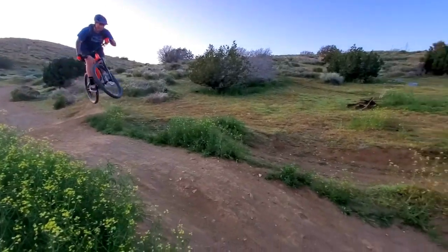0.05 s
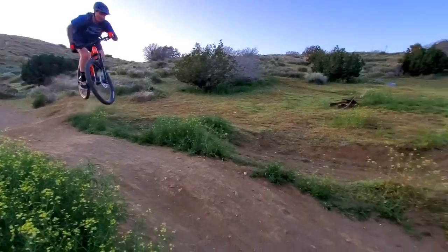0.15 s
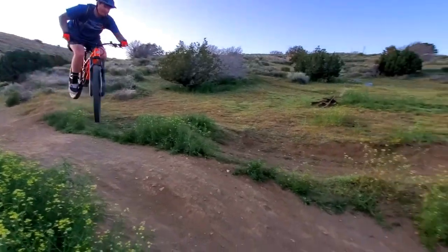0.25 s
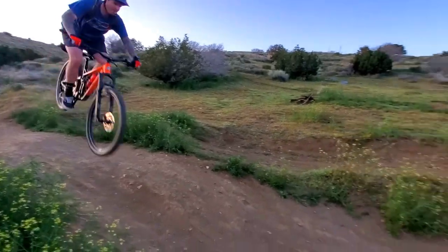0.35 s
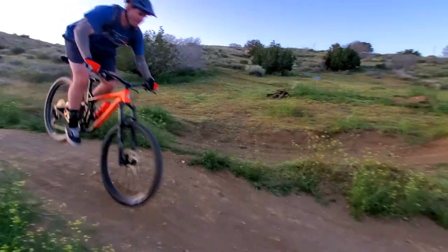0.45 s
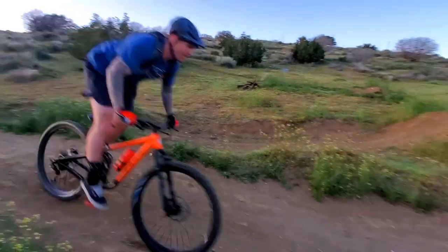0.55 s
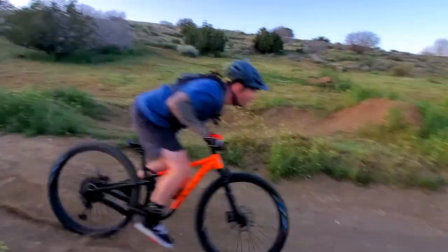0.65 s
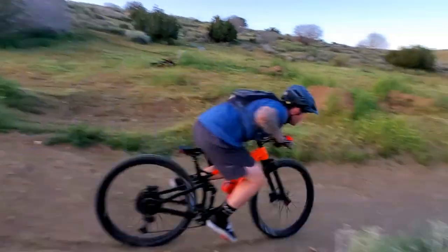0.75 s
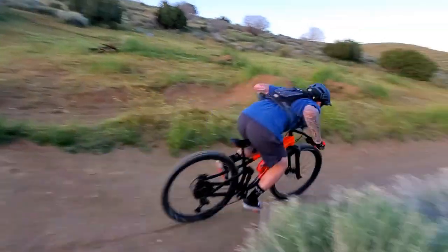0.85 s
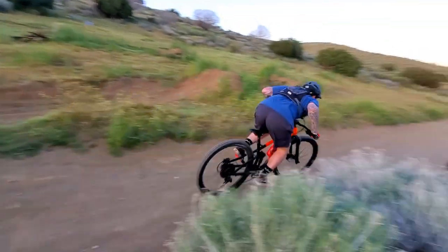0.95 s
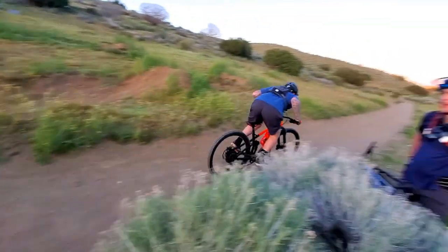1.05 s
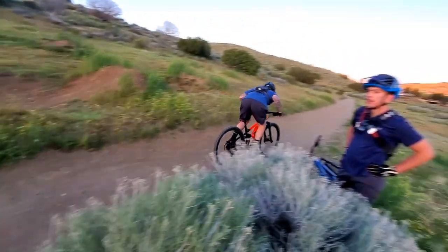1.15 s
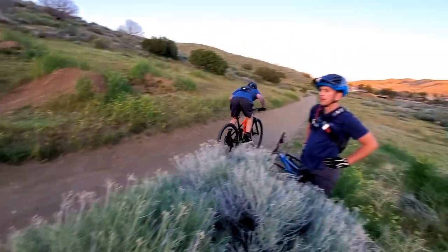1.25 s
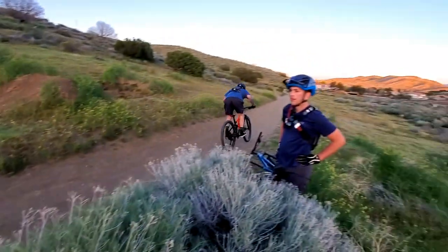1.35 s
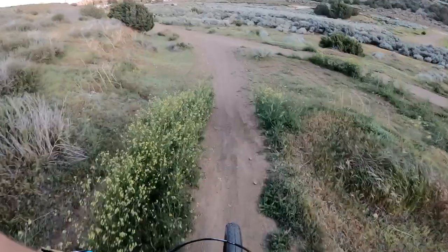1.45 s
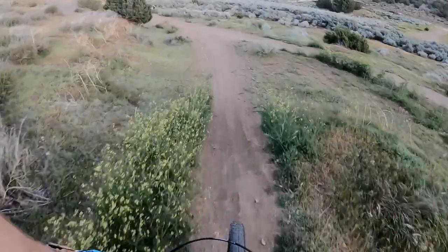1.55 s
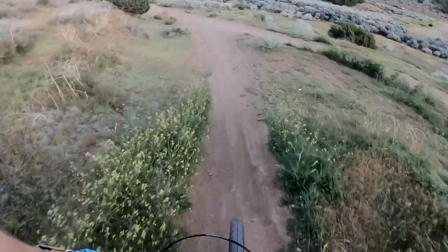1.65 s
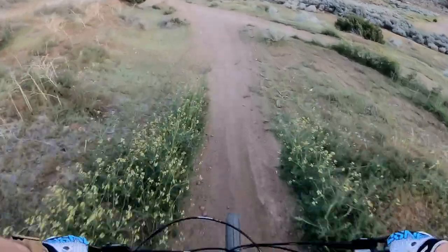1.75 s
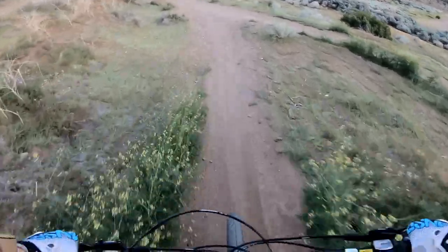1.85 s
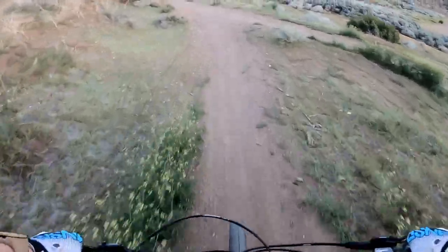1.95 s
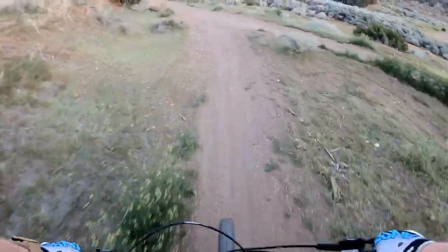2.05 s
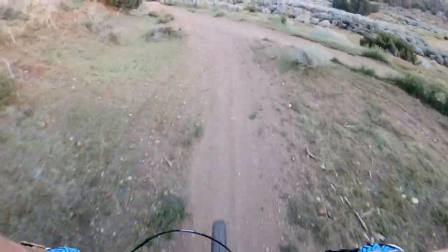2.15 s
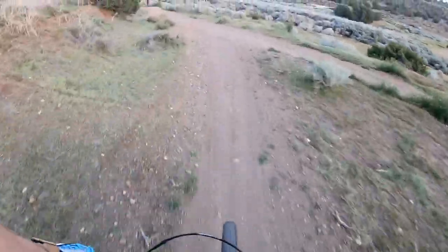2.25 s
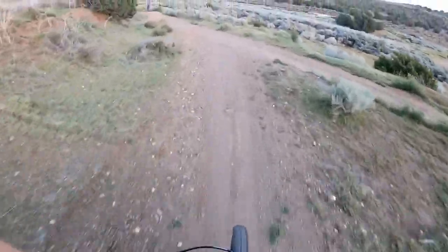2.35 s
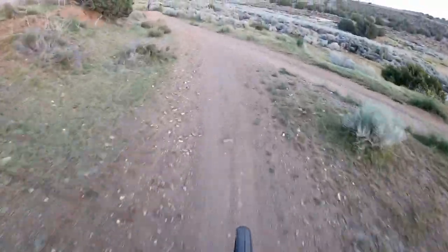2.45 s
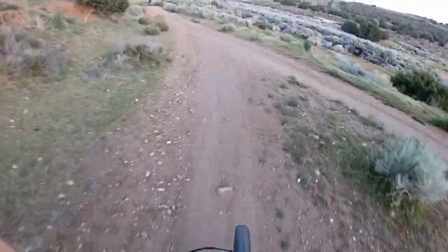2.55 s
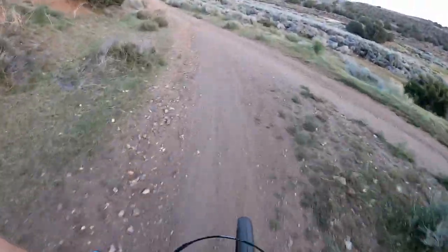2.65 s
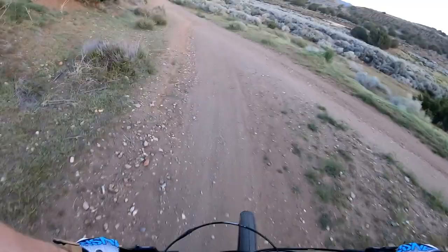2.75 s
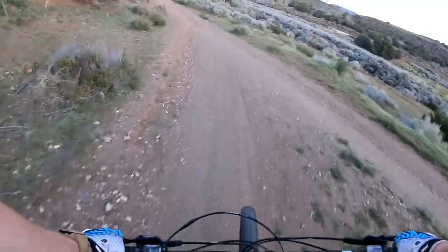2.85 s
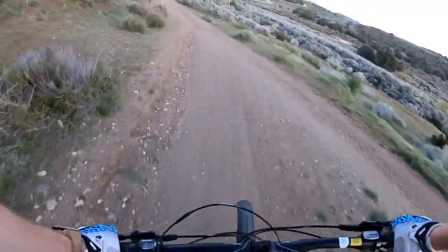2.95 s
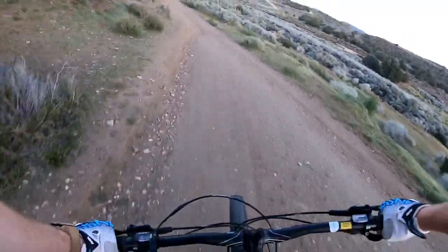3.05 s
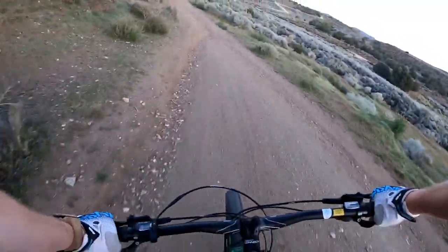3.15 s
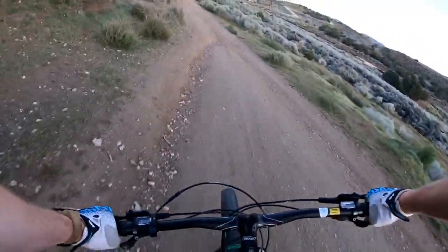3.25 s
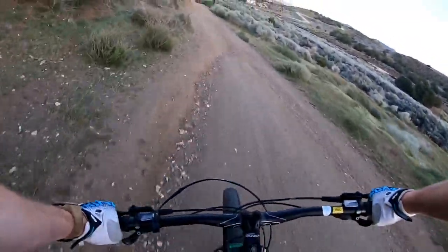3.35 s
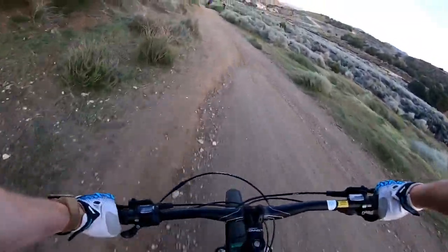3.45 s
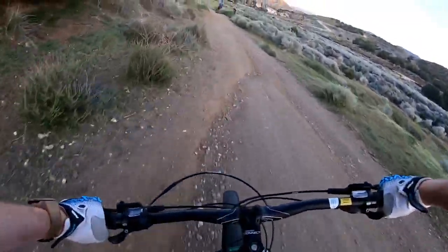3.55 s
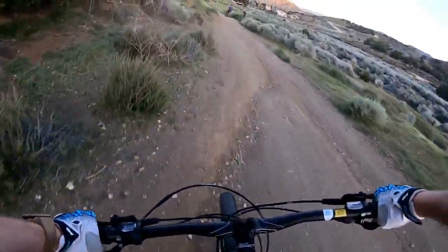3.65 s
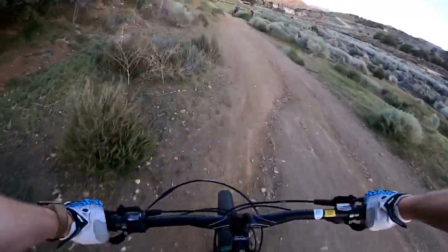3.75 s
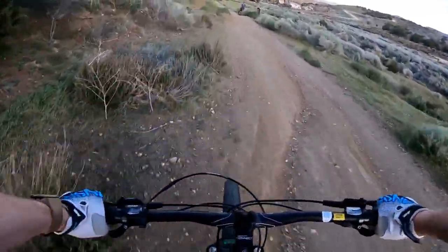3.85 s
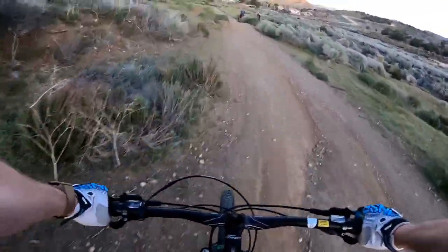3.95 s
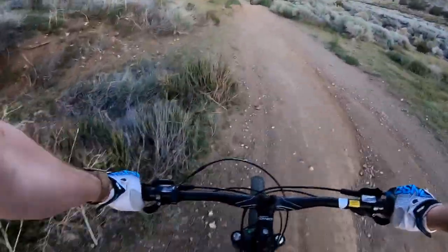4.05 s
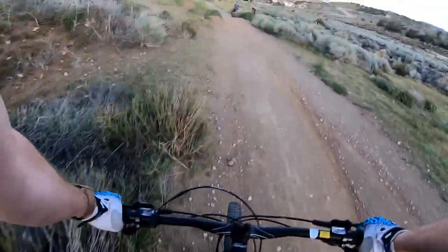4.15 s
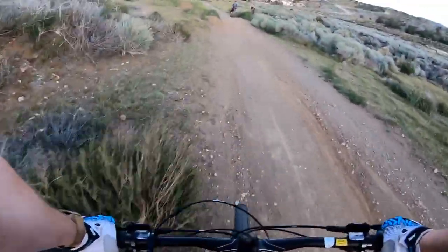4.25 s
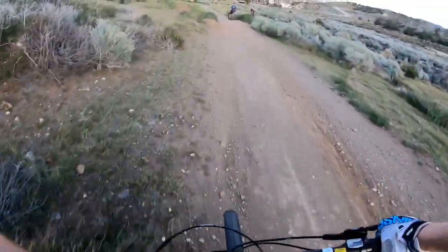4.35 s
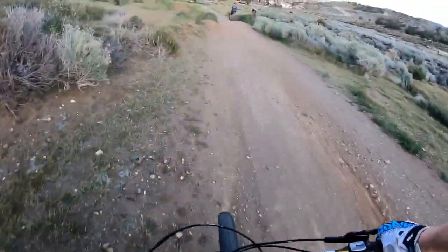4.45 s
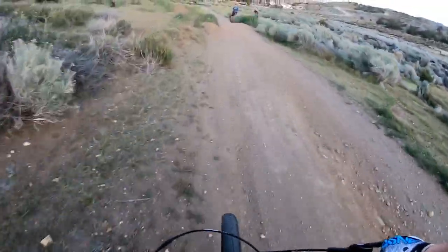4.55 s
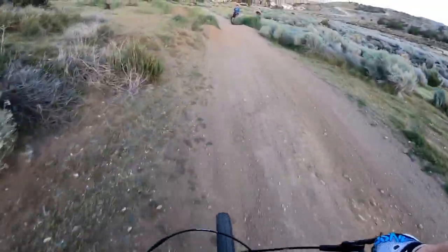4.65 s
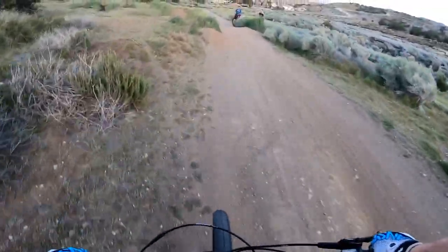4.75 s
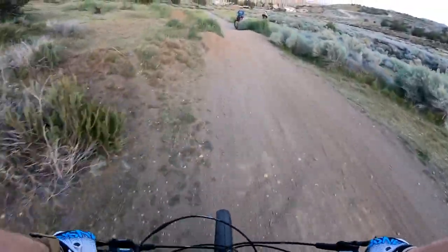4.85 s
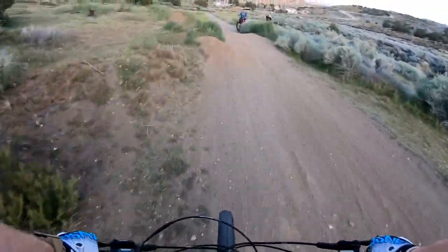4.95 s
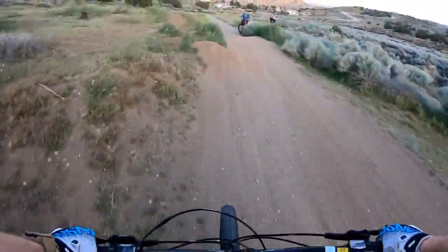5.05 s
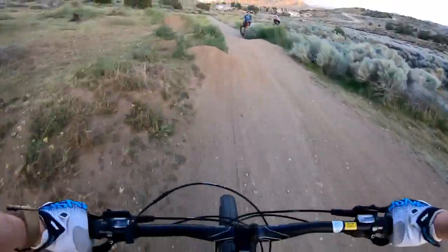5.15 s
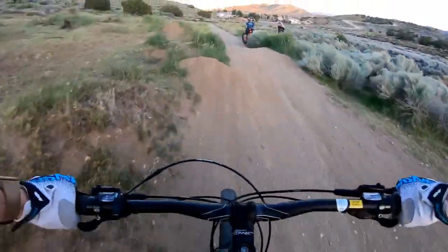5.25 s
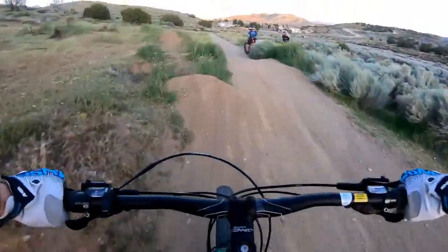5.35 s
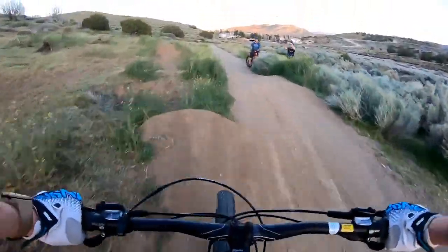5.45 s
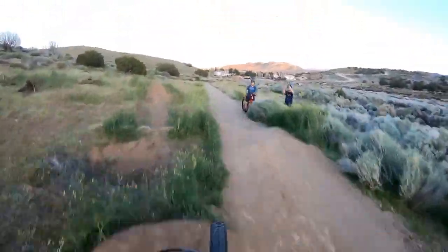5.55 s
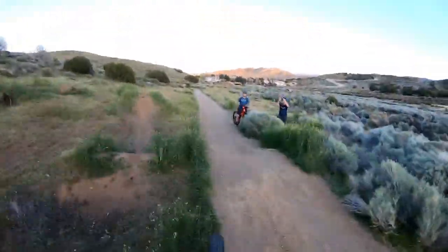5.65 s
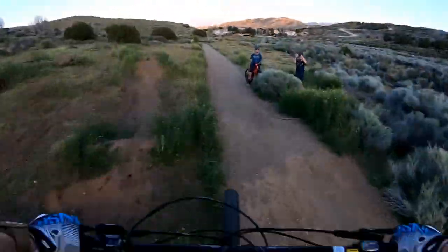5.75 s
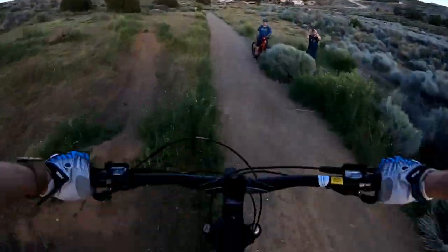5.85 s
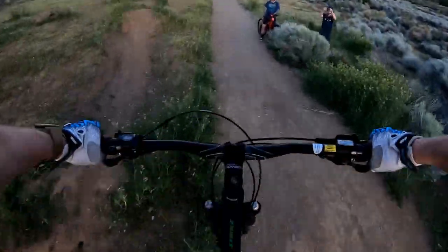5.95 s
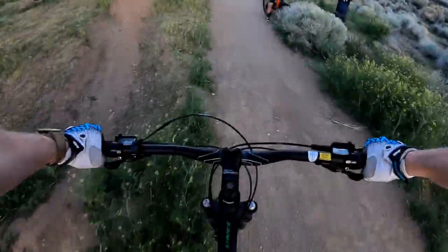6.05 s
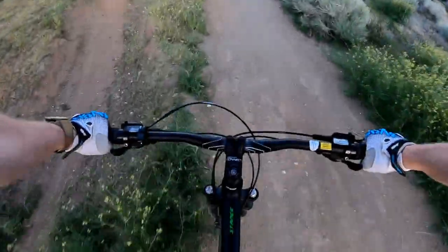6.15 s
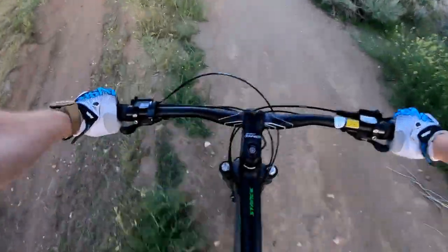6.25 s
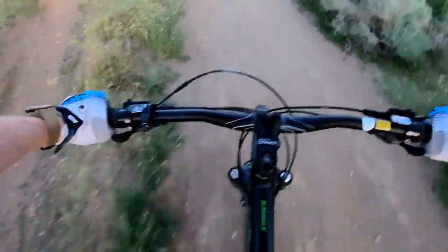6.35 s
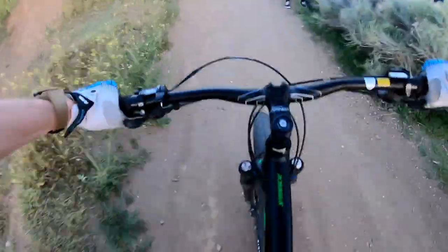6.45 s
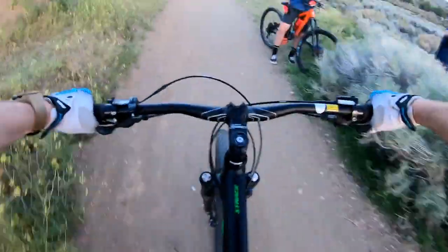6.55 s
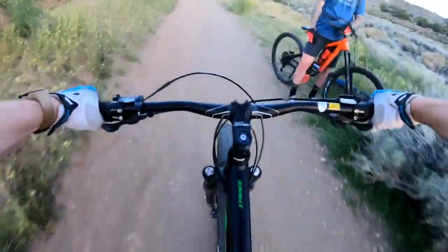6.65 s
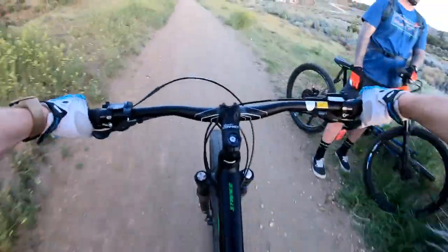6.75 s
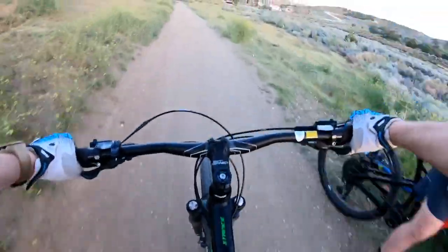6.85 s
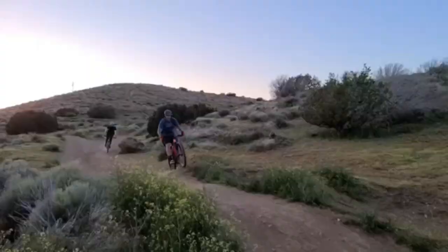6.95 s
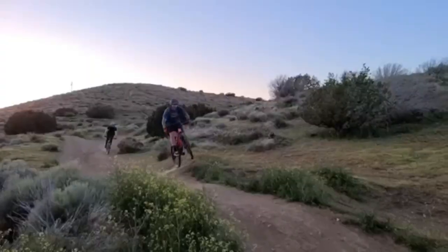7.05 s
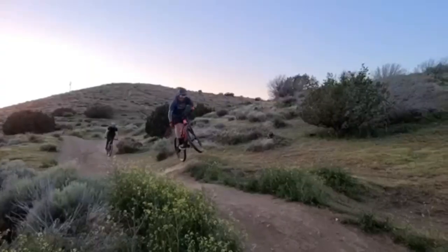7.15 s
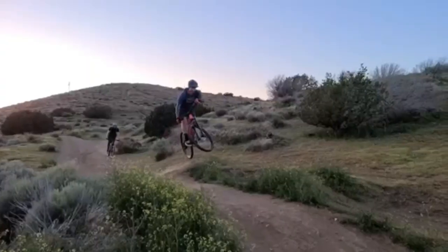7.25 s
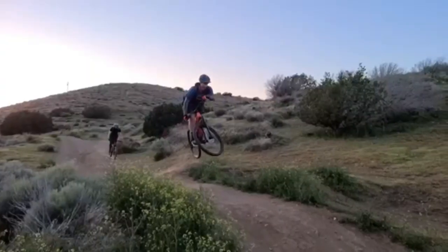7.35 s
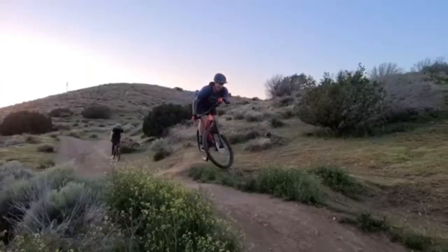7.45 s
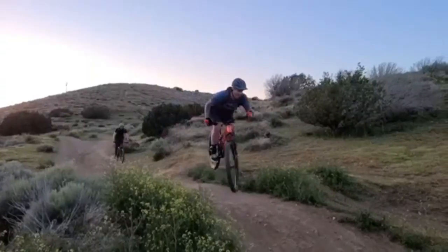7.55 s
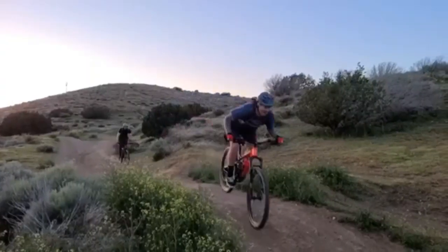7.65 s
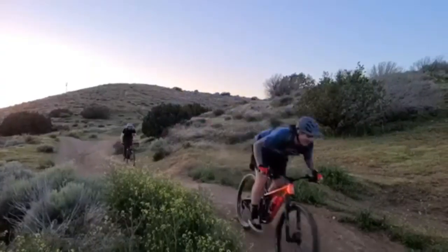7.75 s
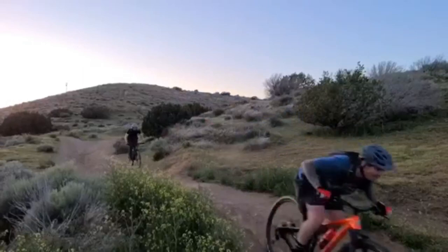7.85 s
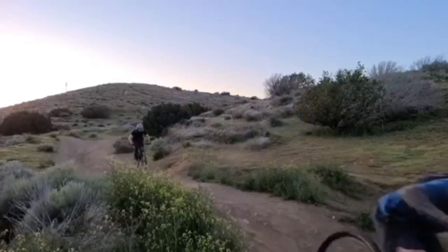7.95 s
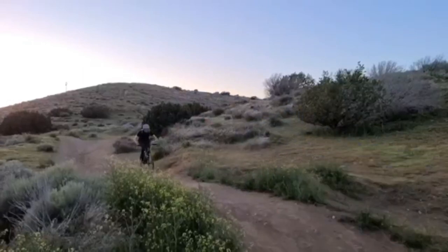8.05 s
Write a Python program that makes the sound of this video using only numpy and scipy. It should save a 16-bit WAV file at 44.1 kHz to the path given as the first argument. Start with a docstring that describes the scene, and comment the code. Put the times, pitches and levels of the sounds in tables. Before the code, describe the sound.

A mountain bike clicks through a jump, slams down and rolls past, then tyres rumble and chain rattles on board before a distant bike jumps and lands.

```python
"""A mountain bike on a dirt trail, heard from three places in turn. At the trackside, pawl clicks and wind noise fill
the flight until decaying noise bursts mark the landing; filtered noise rolls past and a struck brake disc rings.
At the rider's chest, resonant noise makes tyre hum and frame drone, and coloured noise makes wind and crunching dirt;
noise bursts rattle the chain and cables, damped tones jolt the fork, and narrow noise bands sound around a jump.
At the trackside again, the tyre noise of a far bike rolls up, and bursts mark its jump and landing."""
import sys
import numpy as np
from scipy import signal
from scipy.fft import rfft, irfft, next_fast_len
from scipy.io import wavfile
from scipy.ndimage import uniform_filter1d, map_coordinates

SR = 44100
rng = np.random.default_rng(int(sys.argv[2]) if len(sys.argv) > 2 else 0)


def to_wav(sig):
    """Store sig (one row per channel, or 1-D mono) as 16-bit WAV at the path in sys.argv[1].

    Samples outside -1..1 are clipped; the rate is SR.
    """
    pcm = np.clip(np.atleast_2d(sig), -1, 1) * 32767
    pcm = np.round(pcm).astype(np.int16)
    wavfile.write(sys.argv[1], SR, pcm.T)  # frames by channels


N = 357340

# The far bike rolls up: start_s, wind_db, tyre_db
APPROACH_LEVELS = [(6.968, -39, -38.5), (7.004, -16, -37.5), (7.046, -37, -47.5), (7.68, -32, -41.5),
                   (7.739, -25, -42)]
AIR_HZ, AIR_WIDTH_HZ = 294, 42.5  # resonance of the air in the tyre


def gain_of(db):
    """Converts a level in dB to an amplitude ratio by the logarithmic definition."""
    return 10 ** (np.asarray(db) / 20)


def evened(x):
    """Normalizes the root mean square to 1, so that a later gain sets the level."""
    return x / np.sqrt(np.mean(x ** 2) + 1e-20)


def read(points, hz):
    """Interpolates a spectrum along a logarithmic frequency axis."""
    f, value = np.transpose(points)
    return np.interp(np.log(hz + 1), np.log(f + 1), value)


def columns(rows):
    """Gives the start time, then each column by linear interpolation at every sample."""
    s, *rest = np.transpose(rows)
    t = np.arange(s[0], s[-1], 1 / SR)
    return [s[0]] + [np.interp(t, s, c) for c in rest]


def add(mix, s, sound):
    """Superposes a sound on the mix from time s in seconds."""
    part = mix[..., round(s * SR):][..., :sound.shape[-1]]
    part += sound[..., :part.shape[-1]]


def colour(x, points):
    """Linear filtering: multiplies the Fourier spectrum by the gains of a table."""
    n = next_fast_len(len(x))
    gain = gain_of(read(points, np.fft.rfftfreq(n, 1 / SR)))
    return irfft(rfft(x, n) * gain, n)[:len(x)]


def resonate(x, hz, width):
    """Simple resonance of peak gain 1: shift hz to zero, smooth with one pole, shift back."""
    turn = np.exp(2j * np.pi * hz * np.arange(len(x)) / SR)
    r = np.exp(-np.pi * width / SR)
    smooth = signal.lfilter([1 - r], [1, -r], x / turn)
    return 2 * (turn * smooth).real


def gritty(n, lumps_db, lump_ms, patchy_db):
    """Modulated white noise: its level lurches quickly and in patches of time and pitch."""
    a, b, patches = rng.standard_normal((n // 64 + 6, 129, 3)).T
    patches = uniform_filter1d(patches, size=4, axis=0)
    patches = evened(uniform_filter1d(patches, size=20, axis=1))
    spectrum = (a + 1j * b) * gain_of(patchy_db * patches)
    noise = signal.istft(spectrum, nperseg=256, noverlap=192)[1][:n]
    smooth = np.exp(-1000 / (lump_ms * SR))
    two_poles = np.convolve([1, -smooth], [1, -smooth])
    lumps = evened(signal.lfilter([1], two_poles, rng.standard_normal(n)))
    return evened(noise * gain_of(lumps_db * lumps))


def trackside(rows, hiss, bearing):
    """Partial coherence: shared tyre noise reaches two ports at different times; wind buffets each port alone."""
    # Share of tyre noise power unrelated left and right: frequency_hz, share
    scatter = [(100, 0.031), (600, 0.051), (2000, 0.71), (8000, 0.53)]
    # Relative spectrum of the wind in the ports: frequency_hz, density_db
    breeze = [(12, -46), (20, -23), (65, 0.5), (85, -6.5), (145, -15), (242, -32), (500, -52), (650, -63),
              (1100, -120)]
    s, wind_db, tyre_db = columns(rows)
    n = len(wind_db)
    pan_db, lag_ms = np.linspace(*bearing, n).T
    hz, share = np.transpose(scatter)
    share = np.clip(share, .01, .99)
    direct = colour(gritty(n, 2.7, 1.2, 2), np.c_[hz, 10 * np.log10(1 - share)])
    out = np.zeros((2, n))
    for c, side in enumerate((1, -1)):
        heard_at = np.arange(n) - side * lag_ms * SR / 2000  # each port takes half the lag
        late = map_coordinates(direct, [heard_at], order=3, mode="nearest")
        own = colour(gritty(n, 2.5, .8, 2), np.c_[hz, 10 * np.log10(share)])
        tyre = gain_of(tyre_db + side * pan_db / 2) * evened(colour(late + own, hiss))
        buffet = evened(colour(gritty(n, 0.69, 9.9, 0.37), breeze))
        out[c] = tyre + gain_of(wind_db) * buffet
    return s, out


def freewheel():
    """Impact excitation: each pawl click is a bright burst that dies in a few ms, uneven in strength."""
    # Rate of the pawl clicks: time_s, clicks_per_s
    click_rate = [(0.0, 49), (0.36, 49), (0.45, 58), (0.92, 55), (1.0, 70), (1.44, 64)]
    # Level of the clicks: start_s, level_db, left_right_db
    click_level = [(0.0, -57.5, 9.5), (0.418, -55, 9.5), (0.616, -33.5, 4), (1.292, -46, -2.0),
                   (1.447, -49, 2)]
    # Relative spectrum of the hub: frequency_hz, density_db
    hub = [(2060, -39), (3500, -10), (5720, -21), (6830, -8), (7410, -36), (9780, -18), (11000, -12),
           (12800, -5), (13800, -6), (15800, -6.5)]
    s, level_db, pan_db = columns(click_level)
    t = np.arange(len(level_db)) / SR
    rate = np.interp(t, *np.transpose(click_rate))
    count = .27 + np.cumsum(rate) / SR
    strength = gain_of(4.9 * rng.standard_normal(200))[count.astype(int)]
    since = (count % 1) / rate  # seconds since the last click
    burst = np.exp(-since / 0.0055) * (1 - np.exp(-since / 0.00052))
    shape = 0.28 + strength * burst  # a steady noise floor lies under the clicks
    clicks = [evened(shape * colour(rng.standard_normal(len(t)), hub)) for _ in range(2)]
    return s, np.array(clicks) * gain_of(level_db + np.outer([.5, -.5], pan_db))


def landings():
    """Impact: a dirt and frame crack over a low damped push of the tyre; the nearer port hears the crack louder
    and the whole blow first."""
    # Tyres and frame meet the ground: start_s, crack_db, thud_db, left_right_db
    blows = [(0.573, -23, -28.5, 16), (0.592, -16, -12, 1.5), (0.62, -6, -17, 8.5), (6.982, -39, -27, 9),
             (7.205, -49, -33, 2), (7.492, -31, -37, 1), (7.741, -33, -18, -9), (7.755, -27, -34.5, -4),
             (7.792, -32, -30.5, -12)]
    # Relative spectrum of the crack: frequency_hz, density_db
    crack_colour = [(88, -30), (150, -7), (486, -4.5), (1160, -4), (1600, -60), (2270, -16), (4720, -18),
                    (15000, -34.5)]
    crack_t60_s = 0.024
    out, t = np.zeros((2, N)), np.arange(SR // 6) / SR
    for s, db, thud_db, pan_db in blows:
        common, *own = rng.standard_normal((3, len(t)))
        thud = gain_of(thud_db) * np.sin(2 * np.pi * 75 * t) * np.exp(-t / 0.012)
        for c, side in enumerate((1, -1)):
            crack = evened(colour(common + .5 * own[c], crack_colour)) * (1 - np.exp(-t / .0004))
            crack_db = db + side * pan_db / 2 - 60 * t / crack_t60_s
            # each port's arrival shifts by 35 microseconds per dB
            add(out[c], s - side * pan_db * 3.5e-5, gain_of(crack_db) * crack + thud)
    return out


def disc_ping():
    """Modal ringing: a stone strikes a brake disc, whose close modes waver and sink as the bike moves off;
    the ports hear them in opposite phase."""
    # Modes of the disc, before the sinking of pitch: frequency_hz, level_db, t60_s
    disc = [(6700, -42, 0.62), (6300, -24.5, 0.63), (6400, -32, .25), (11700, -33, 0.22)]
    start_s = .898
    sink, sink_s = 0.0145, 0.047  # starts sharp by this share and settles with this time constant
    t = np.arange(SR // 2) / SR
    warped = t - 0.008 * t ** 2 - sink * sink_s * np.exp(-t / sink_s)

    def waver():
        """Slow random amplitude modulation."""
        drift = uniform_filter1d(rng.standard_normal(len(t)), size=700)
        return gain_of(3.4 * evened(uniform_filter1d(drift, size=700)))

    ring = sum(waver() * gain_of(db - 60 * t / t60) * np.sin(2 * np.pi * hz * warped)
               for hz, db, t60 in disc)
    return start_s, ring * (1 - np.exp(-t / 0.0028)) * np.array([[1], [-.4]])


def ride(rows, grit_db):
    """Forced vibration: knobs and stones drive the resonances of tyre and frame; dirt crunches, scrapes and hisses."""
    # Resonances of fork and frame, mixed before the drone is levelled: frequency_hz, width_hz, level_db
    frame_drone = [(365, 99, 8.5), (425.6, 101, 4.5), (476, 46, -1), (578, 87, 0.5)]
    # Relative spectra of the dirt layers: frequency_hz, density_db
    crunch = [(380, -10.5), (650, -5.5), (729, -10.5), (922, -6), (1400, -7.5), (1800, -26), (2340, -56),
              (3960, -120)]
    scrape = [(1400, -18.5), (1850, -6.5), (2150, 0), (2450, -0.5), (2900, 2.5), (3250, -4.5),
              (3800, -13.5), (5000, -53.5), (7000, -57.5)]
    grit = [(2470, -33.5), (4200, -1.5), (4810, -8.5), (8190, -15), (9930, -22), (10900, -33),
            (12000, -46.5), (15600, -61), (22000, -120)]
    drone_offset_db, hum_share, grit_slope = -1, 0.84, 0.54
    s, hum_db, crunch_db, scrape_db = columns(rows)
    n = len(hum_db)
    # the drone lies between hum and crunch; fine grit follows the scrape by about half as much
    drone_db = drone_offset_db + hum_share * hum_db + (1 - hum_share) * crunch_db
    levels_db = hum_db, drone_db, crunch_db, scrape_db, grit_db + grit_slope * scrape_db

    def steep(x, hz, width):
        """Two equal resonances in series, each 1.75 times wider, for steeper skirts."""
        return evened(resonate(resonate(x, hz, 1.75 * width), hz, 1.75 * width))

    # low-pass: keeps hum and drone free of treble
    knobs = colour(gritty(n, 1.5, 4, 0.8), [(1000, -4), (5000, -35)])
    drone = sum(gain_of(db) * steep(knobs, hz, width) for hz, width, db in frame_drone)
    dirt = gritty(n, 2.2, 1.5, 1.9)  # the upper layers share the same grains
    layers = [steep(knobs, AIR_HZ, AIR_WIDTH_HZ), drone]
    layers += [colour(dirt, spectrum) for spectrum in (crunch, scrape, grit)]
    from_end = np.minimum(np.arange(n), n - np.arange(n))
    edge = np.sin(np.pi / 2 * np.clip(from_end / 40, 0, 1)) ** 2  # fades over 40 samples
    return s, edge * sum(gain_of(db) * evened(x) for db, x in zip(levels_db, layers))


def wind():
    """Turbulent pressure: low thumping on the housing, with the buffeting rarely far above the gust that drives it."""
    # Gusts at the rider's chest: start_s, level_db
    gusts = [(1.45, -41), (1.65, -29), (2.06, -34.5), (2.5, -30), (3.14, -22.5), (3.27, -28.5),
             (3.34, -20.5), (3.44, -30), (3.5, -20.5), (3.66, -30), (4.22, -22), (4.3, -15.5),
             (4.39, -26.5), (5.12, -30), (5.17, -17), (5.23, -30.5), (5.54, -35.5), (5.78, -21),
             (5.84, -31), (6.11, -19.5), (6.17, -21.5), (6.21, -17), (6.38, -17.5), (6.42, -23.5),
             (6.93, -20.5)]
    # Relative spectrum of the thumping: frequency_hz, density_db
    thump_colour = [(12, -43), (20, -4), (97, 1), (387, -23.5), (515, -37), (634, -33), (900, -76),
                    (1170, -85), (1980, -120)]
    s, level_db = columns(gusts)
    n = len(level_db)
    buffet = evened(colour(gritty(n, 4.2, 18.6, 0.69), thump_colour))
    buffet /= (uniform_filter1d(buffet ** 2, size=3000) + .05) ** .3  # compresses strong buffets
    return s, gain_of(level_db) * evened(buffet) * signal.windows.tukey(n, 80 / n)


def rattles():
    """Clustered impacts: chain and cables slap the frame in tiny hits, a bright jingle and a knock on the frame
    modes, which are strongest near the struck pitch."""
    # Loud slaps: start_s, jingle_peak_db, knock_db, struck_centre_hz, sizzle_peak_db
    slaps = [(1.9779, -37, -28, 2650, -65), (2.046, -28, -35, 2870, -46), (2.069, -36, -29, 2870, -67),
             (2.1534, -41, -36, 2750, -61), (2.368, -23.5, -20.5, 2310, -55), (2.534, -44, -33, 2900, -71),
             (2.5716, -34, -26, 2100, -64), (2.6032, -32, -17.5, 2210, -59), (2.6125, -25, -28, 2650, -58),
             (2.6492, -30, -25.5, 3000, -64), (2.7337, -34, -35, 2170, -72), (2.8524, -32, -29, 2100, -66),
             (2.8895, -31, -39, 1320, -69), (3.3756, -30.5, -31, 1380, -70),
             (3.5594, -30.5, -34, 1400, -69), (3.8736, -32, -30, 1430, -76), (3.9905, -33, -36, 1390, -68),
             (4.0472, -36, -42, 2240, -68), (4.0861, -30.5, -33, 2550, -62),
             (4.1485, -31, -22.5, 1490, -71), (4.2397, -29.5, -42, 2910, -59),
             (4.4615, -31.5, -24.5, 2410, -69), (4.5067, -23.5, -23, 2380, -64),
             (4.5401, -27, -28, 3430, -63), (4.577, -35, -31, 1340, -67), (4.604, -24.5, -23, 3430, -61),
             (4.6428, -22.5, -24.5, 3420, -59), (4.7636, -24, -27, 2220, -63),
             (5.3655, -30.5, -31, 3000, -65), (5.3964, -34, -37, 2970, -66), (5.5892, -25, -17, 1540, -60),
             (5.744, -25.5, -26.5, 2410, -55), (5.8497, -49, -32, 3690, -83),
             (6.317, -45, -26.5, 3480, -75), (6.3505, -30, -27, 3370, -64), (6.386, -22.5, -24, 1540, -60),
             (6.4034, -25, -20, 2120, -62), (6.4148, -19, -18, 2570, -57), (6.4358, -17, -12.5, 1710, -57),
             (6.447, -25, -21, 2860, -59), (6.4885, -18, -15.5, 3770, -60), (6.5241, -21, -15.5, 1580, -68),
             (6.57, -23, -10.5, 1560, -63), (6.5896, -20.5, -24, 2040, -63), (6.628, -29.5, -31, 2640, -68),
             (6.7007, -27, -29, 2100, -63), (6.8374, -36, -31, 2020, -75)]
    # Relative spectra of jingle and sizzle: frequency_hz, density_db
    jingle = [(3000, -58), (4200, 2), (7700, 0), (10200, -7.5), (11500, -35), (15000, -64)]
    sizzle = [(10000, -30), (11200, -9), (14300, -8), (15300, -35)]
    # Frame modes, before weighting by the struck centre: frequency_hz, width_hz (doubled in a second stage), level_db
    frame = [(1677, 290, -2.5), (2110, 520, -1.5), (2914, 280, -0.5), (3554, 670, 1), (4780, 640, -11),
             (7550, 300, -20), (9800, 620, -20.5)]
    faint_count, mean_faint_db, faint_hz = 32, -43, (1300, 3800)  # slaps scattered between the loud ones
    slap_s, knock_s, rise_share = 0.0046, 0.0029, 0.93  # decay times; rise as a share of the decay
    jangle_db, jangle_s = -19.5, 0.058  # a weak, longer swell of jingle, before and after each slap
    jingle_crest_db, sizzle_crest_db = 9.5, 2.5  # peak over mean
    struck_db_per_octave = 13
    out, t = np.zeros(N), np.arange(-900, 1800) / SR
    at, size, pitch = rng.random((faint_count, 3)).T
    at = 1.46 + at * 4.3  # until the take-off
    faint_db = mean_faint_db + 9 * (size - .5)
    faint = np.c_[at, faint_db, faint_db + 1.5, np.interp(pitch, [0, 1], faint_hz), faint_db - 35]

    def swell(width):
        """Exponential rise and decay about a peak."""
        after = t - slap_s / 2
        return np.exp(np.where(after < 0, after / (rise_share * width), -after / width))

    weak_swell = np.exp(-abs(t) / jangle_s) * signal.windows.tukey(len(t), .5)
    jangle = swell(slap_s) + gain_of(jangle_db) * weak_swell
    for s, db, knock_db, centre_hz, sizzle_db in np.r_[slaps, faint]:
        hits = rng.standard_normal(len(t))
        knock = 0
        for hz, width, mode_db in frame:
            mode = evened(resonate(resonate(hits, hz, width), hz, 2 * width))
            knock = knock + gain_of(mode_db - struck_db_per_octave * abs(np.log2(hz / centre_hz))) * mode
        knock = colour(knock, [(10000, 0), (12000, -25)])  # low-pass: keeps the knock below the bright jingle
        bright = gain_of(db - jingle_crest_db) * evened(colour(hits, jingle))
        bright += gain_of(sizzle_db - sizzle_crest_db) * evened(colour(hits, sizzle))
        add(out, s + t[0], jangle * bright + swell(knock_s) * gain_of(knock_db) * evened(knock))
    return out


def jolts():
    """Damped oscillation: stones and bumps jolt the fork into short rings over a kick of the air in the tyre."""
    # Jolts of the fork: start_s, level_db, pitch_hz
    bumps = [(1.736, -18, 960), (2.067, -23, 660), (2.565, -12.5, 577), (2.603, -19, 470),
             (3.736, -15, 1080), (3.915, -20, 573), (4.15, -17.5, 660), (4.458, -13, 1064),
             (4.57, -15, 640), (6.189, -25, 509), (6.269, -24, 600), (6.319, -17.5, 465),
             (6.405, -14.5, 1100)]
    out, t = np.zeros(N), np.arange(3000) / SR
    kick = 1.3 * np.exp(-t / 0.0037) * np.sin(2 * np.pi * AIR_HZ * t)
    attack = 1 - np.exp(-t / 0.00078)
    for s, db, hz in bumps:
        ring = np.exp(-t / 0.0043) * np.sin(2 * np.pi * hz * t)
        add(out, s, gain_of(db) * (ring + kick) * attack)
    return out


def narrow_bands():
    """Resonant filtering: narrow bands of fluttering noise swell briefly."""
    # A growl and a ring at take-off, very faint narrow noise bands during the jump, a ring after the landing:
    # frequency_hz, width_hz (of each of two stages), level_db, start_s, end_s
    bands = [(562, 57, -28.5, 5.56, 5.79), (3840, 450, -28, 5.575, 5.61), (2270, 380, -56, 5.98, 6.2),
             (9700, 120, -74, 5.74, 6.22), (10200, 120, -79, 5.74, 6.2), (3980, 210, -37, 6.535, 6.59)]
    out = np.zeros(N)
    for hz, width, db, start, end in bands:
        n = round((end - start) * SR)
        band = resonate(resonate(gritty(n, 2, 6, 1), hz, width), hz, width)
        add(out, start, gain_of(db) * evened(band) * signal.windows.tukey(n, .4))
    return out


def scene():
    """Superposition: the three places follow each other with short gaps; at the chest both channels are alike."""
    # Trackside stretches: start_s, wind_db, tyre_db (during the flight, the level of the background floor)
    flight_levels = [(0.0, -34, -61), (0.05, -38, -64), (0.08, -21.5, -66), (0.12, -35.5, -62.5),
                     (0.534, -50, -50), (0.57, -31, -46.5)]
    roll_out_levels = [(0.571, -37, -27), (0.591, -32, -24.5), (0.66, -37, -24.5), (0.73, -28, -25.5),
                       (1.259, -56, -37.5), (1.397, -28, -38), (1.444, -54, -40.5)]
    touch_down_levels = [(7.739, -20, -27.5), (7.915, -41, -28), (8.103, -30, -25)]
    # Relative spectra of the hiss in each stretch: a background floor while the bike is in the air, then the
    # tyres at each distance: frequency_hz, density_db
    flight_hiss = [(150, -13), (300, -5.5), (550, -4.5), (1100, -9), (1500, -6.5), (1900, -12),
                   (4000, -17.5), (9000, -21.5), (13000, -45)]
    roll_out_hiss = [(88, -6), (150, -4.5), (244, -1), (373, -11.5), (420, -1.5), (781, -8), (2230, -11.5),
                     (2450, -7.5), (7560, -26), (15500, -39)]
    approach_hiss = [(150, -28), (280, -6), (620, -7), (900, -8.5), (1450, -18), (1900, -15), (4000, -16.5),
                     (6000, -22), (7100, -32.5), (12800, -26)]
    touch_down_hiss = [(120, -20), (200, -4.5), (388, -9), (754, -7.5), (2150, -16.5), (3900, -12.5),
                       (4640, -25.5), (6130, -16), (8700, -36.5), (13000, -26.5)]
    # Where the bike is at the start and end of each stretch: left_right_db, left_lag_ms
    bearings = [
        [(2, -0.38), (4, -0.21)],
        [(3, -0.2), (2.5, 0.066)],
        [(-4, 0.027), (-3, 0.038)],
        [(-3, 0.23), (-2.5, 0.19)],
    ]
    # On the rider, split where the wheels slam down: start_s, hum_db, crunch_db, scrape_db
    ride_levels = [
        [(1.45, -25.5, -37, -36.5), (1.63, -27.5, -35.5, -37.5), (1.77, -38, -36, -43),
         (1.9, -33.5, -36.5, -43), (1.96, -33, -34, -41), (2.12, -19, -33.5, -32.5),
         (2.29, -24.5, -33.5, -33.5), (3.15, -27, -34, -34.5), (3.23, -36, -34.5, -34), (3.73, -36, -34, -36)],
        [(3.73, -24.5, -30, -28.5), (3.88, -18, -27, -33), (4.24, -39, -35.5, -40.5), (4.64, -29.5, -31.5, -32),
         (4.87, -33, -33.5, -37.5), (5.53, -34, -29, -33), (5.64, -17.5, -30.5, -28), (5.77, -30, -36.5, -42),
         (5.87, -49.5, -48.5, -51.5), (6.31, -47, -54.5, -55.5)],
        [(6.313, -28, -28.5, -33), (6.42, -31, -31.5, -28.5), (6.515, -41, -35, -36.5),
         (6.771, -31.5, -35, -37), (6.927, -30, -41, -39.5)],
    ]
    grit_db = -32.5, -33, -29.5  # offset of the grit in each stretch; the dirt after the jump is looser
    out = landings() + rattles() + jolts() + narrow_bands()
    levels = flight_levels, roll_out_levels, APPROACH_LEVELS, touch_down_levels
    hisses = flight_hiss, roll_out_hiss, approach_hiss, touch_down_hiss
    for stretch in zip(levels, hisses, bearings):
        add(out, *trackside(*stretch))
    for stretch in zip(ride_levels, grit_db):
        add(out, *ride(*stretch))
    for source in (freewheel, disc_ping, wind):
        add(out, *source())
    return out


def record(dry):
    """Low-pass filtering: the last trackside part has a narrower band; then the overall band limit."""
    edge_hz, last_edge_hz = 15850, 13000

    def low(x, edge):
        """Linear-phase low-pass by convolution with a windowed sinc."""
        taps = signal.firwin(511, edge, window=("kaiser", 9), fs=SR)
        return signal.oaconvolve(x, taps[None], "same")

    cut = round(APPROACH_LEVELS[0][0] * SR) - 600  # samples, just ahead of the far bike
    return low(np.c_[dry[:, :cut], low(dry[:, cut:], last_edge_hz)], edge_hz)


dry = scene()
out = record(dry)
to_wav(out)
```